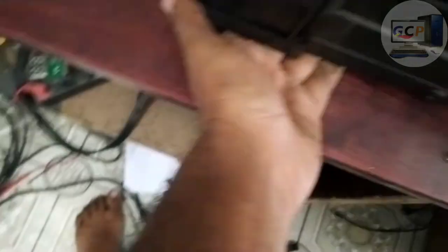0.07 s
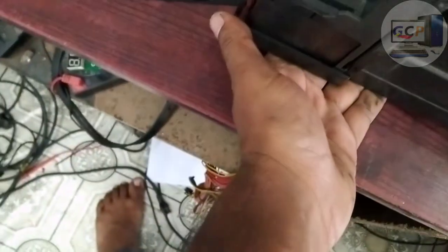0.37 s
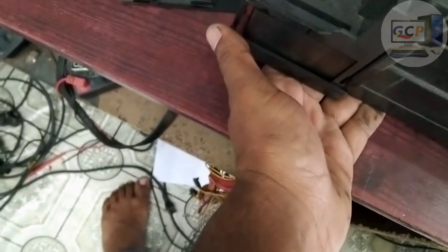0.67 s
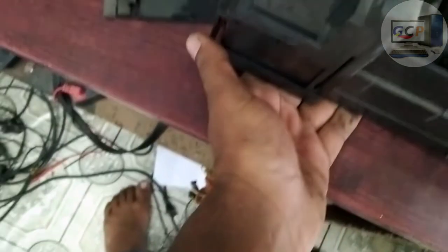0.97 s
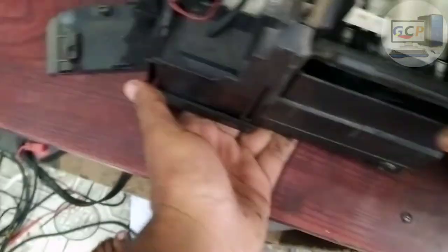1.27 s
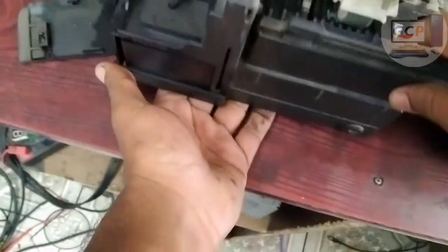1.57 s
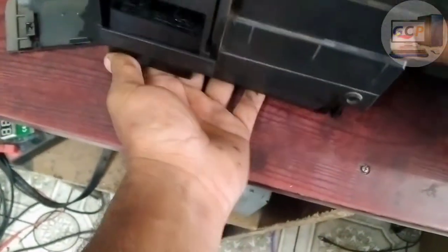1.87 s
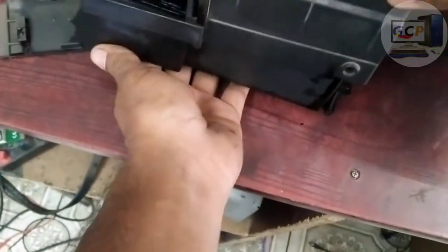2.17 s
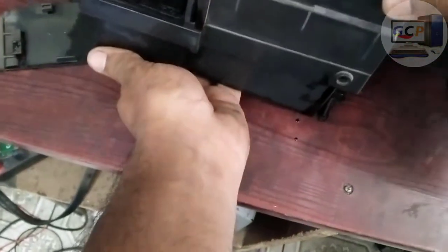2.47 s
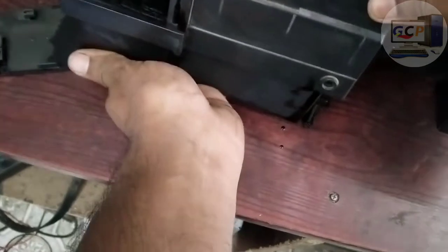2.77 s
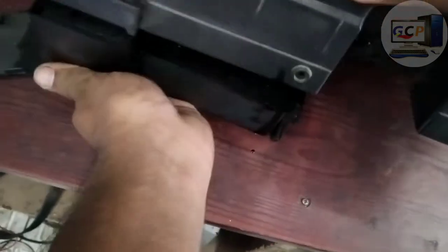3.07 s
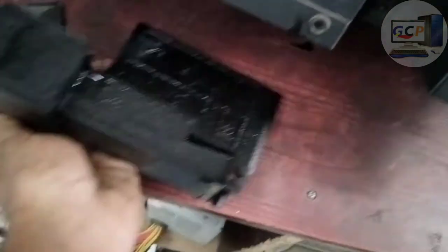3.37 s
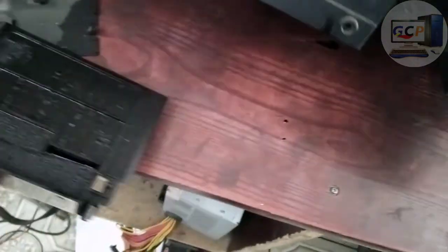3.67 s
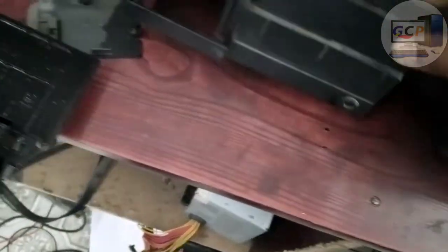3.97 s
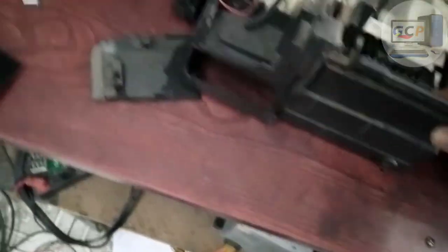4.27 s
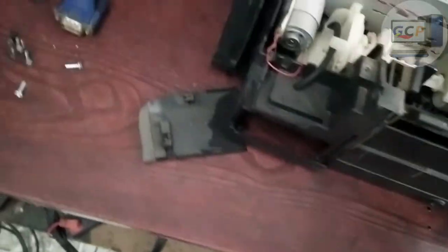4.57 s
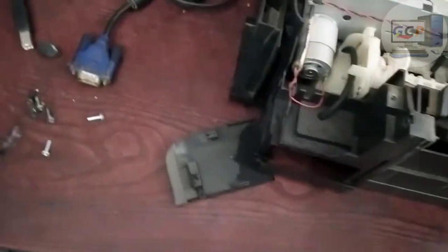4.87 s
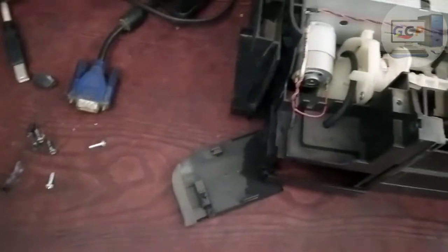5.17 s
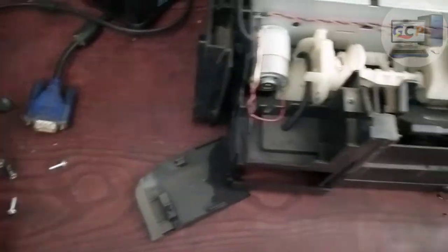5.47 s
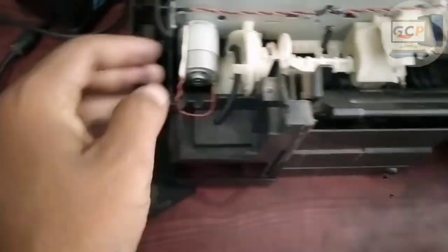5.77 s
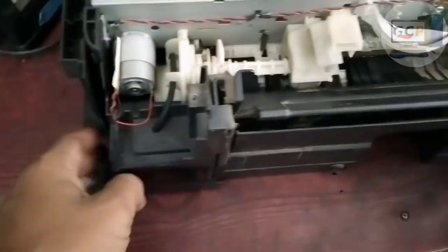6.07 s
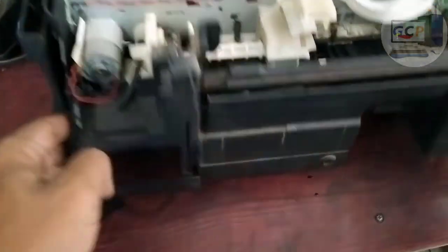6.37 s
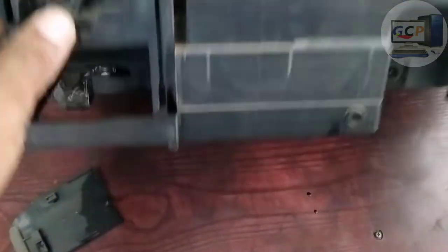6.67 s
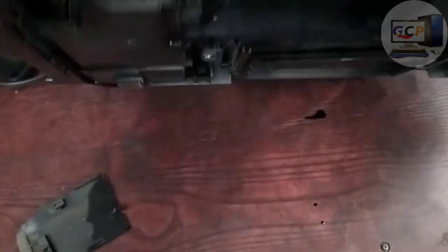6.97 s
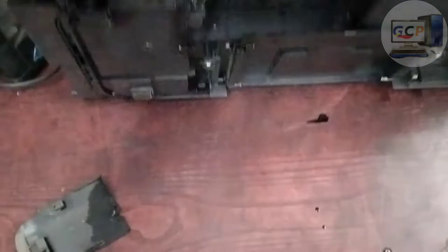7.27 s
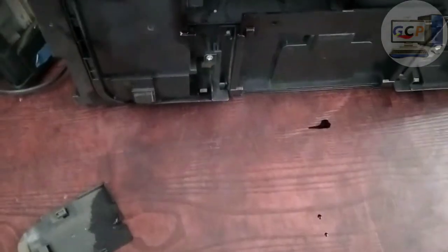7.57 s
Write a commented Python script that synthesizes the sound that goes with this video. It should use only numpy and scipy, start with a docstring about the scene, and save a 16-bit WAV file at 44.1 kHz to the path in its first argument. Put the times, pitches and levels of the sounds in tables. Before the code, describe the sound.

Hands take apart a plastic printer on a wooden table in a small room. Its hollow shell scrapes and briefly squeaks, a catch snaps, and loose tabs tick. Sharp clacks and dull bumps follow as a tray judders out. The printer is set down with a short rattle, then dragged round with a rough groan and tipped over with a loud thump. It all sounds close, with a little room echo.

```python
"""A plastic printer is taken apart by hand on a wooden table in a small room.
Its hollow shell creaks, scrapes and squeaks as it grips and slips under the fingers and on the wood.
Hard parts clack, loose tabs tick, a catch snaps, and a tray judders out and is put aside.
The printer is set down with a rattle, dragged round with a groan and tipped over with a thump."""
import sys
import numpy as np
from scipy import signal
from scipy.fft import rfft, irfft
from scipy.io import wavfile

SR = 44100
rng = np.random.default_rng(int(sys.argv[2]) if len(sys.argv) > 2 else 0)


def file_out(sig):
    """Save sig as 16-bit WAV at sys.argv[1]."""
    # one column per channel
    cols = np.atleast_2d(sig).T
    # limit, then scale
    lim = np.clip(cols, -1, 1)
    pcm = np.round(lim * 32767).astype(np.int16)
    wavfile.write(sys.argv[1], SR, pcm)


N = 336483
TIME = np.arange(N) / SR


def from_db(db):
    """Turn decibels into a number to multiply a sound by."""
    return 10 ** (np.asarray(db) / 20)


def rms_one(x):
    """Scale a sound so its average strength (rms) is 1."""
    return x / np.sqrt(np.mean(x ** 2) + 1e-20)


def unit_energy(x):
    """Scale a sound so its total energy is 1."""
    return x / np.sqrt(np.sum(x ** 2) + 1e-20)


def at_hz(table, hz):
    """Read a value between the rows of a table, on a scale of octaves."""
    row_hz, values = np.transpose(table)
    return np.interp(np.log(hz + 1e-9), np.log(row_hz), values)


def band(x, low_hz, high_hz, order=2):
    """Keep the part of a sound between two frequencies."""
    sections = signal.butter(order, [low_hz, high_hz], "band", fs=SR, output="sos")
    return signal.sosfilt(sections, x + 1e-18)


def add(out, start_s, sound):
    """Mix a short sound in at its start time."""
    i = int(start_s * SR)
    out[i:i + len(sound)] += sound[:N - i]


def drift(turns_per_s):
    """A random wobble, about 1 in size."""
    turns = np.arange(0, N / SR + 1, 1 / turns_per_s)
    return rms_one(np.interp(TIME, turns, rng.standard_normal(len(turns))))


def push(start_s, length_s, level_db, swell_db, fade_db_per_s, rise_s=0.015):
    """The loudness of one hand movement: it sets in, swells or eases, then dies away."""
    t = TIME - start_s
    held_db = level_db + swell_db * np.clip(t / length_s, 0, 1)
    fade_db = fade_db_per_s * np.clip(t - length_s, 0, 1)
    return np.clip(t / rise_s, 0, 1) * from_db(held_db - fade_db)


def resonate(x, tones):
    """Shake an object with x: it rings at its own tones, longer at the narrow ones."""
    out = 0
    for k, (hz, width_hz, db) in enumerate(tones):
        r = np.exp(-np.pi * width_hz / SR)
        feed = np.array([1, 0, -1]) * (1 - r * r) / 2
        feedback = [1, -2 * r * np.cos(2 * np.pi * hz / SR), r * r]
        out = out + (-1) ** k * from_db(db) * signal.lfilter(feed, feedback, x + 1e-18)
    return out


def strike(blows, tones, spread_db):
    """Each blow rings all of an object's tones; each tone fades by 60 dB in its ring_s."""
    out, t = np.zeros(N), TIME[:SR // 2]
    hz, tone_db, ring_s = np.transpose(tones)
    rings = np.sin(2 * np.pi * hz[:, None] * t) * np.exp(-np.log(1000) * t / ring_s[:, None])
    signs = (-1) ** np.arange(len(tones))
    for start_s, db in blows:
        strengths = from_db(db + tone_db + spread_db * rng.standard_normal(len(tones)))
        add(out, start_s, (strengths * signs) @ rings)
    return out


def touches(per_s, low_hz, high_hz, ring_s, spread_db):
    """Light touches at random times each set a different panel ringing briefly."""
    out, t = np.zeros(N), TIME[:SR // 6]
    swell = t / ring_s * np.exp(-t / ring_s)
    for when, pitch, size, phase in rng.random((int(per_s * N / SR), 4)):
        hz = low_hz * (high_hz / low_hz) ** pitch
        ring = swell * np.sin(2 * np.pi * (hz * t + phase))
        add(out, when * N / SR, from_db(spread_db * size) * ring)
    return rms_one(out)


def tiny_slips(per_s, size_db, max_size, judder_db, judder_per_s):
    """Rubbing is many tiny, uneven slips; judder makes them stronger in bunches."""
    sizes = from_db(size_db * np.minimum(rng.exponential(1, N), max_size))
    directions = rng.choice([-1, 1], N)
    slipping = rng.random(N) < per_s / SR
    return slipping * sizes * directions * from_db(judder_db * drift(judder_per_s))


def stick_slip(track, jitter, jitter_per_s, octave_db):
    """A surface grips and slips so fast that the slips become an unsteady tone."""
    times, slips_per_s, db = np.transpose(track)
    pitch_hz = np.interp(TIME, times, slips_per_s) * (1 + jitter * drift(jitter_per_s))
    phase = 2 * np.pi * np.cumsum(pitch_hz) / SR
    loudness = from_db(np.interp(TIME, times, db, left=-200, right=-200))
    return loudness * rms_one(np.sin(phase) + from_db(octave_db) * np.sin(2 * phase))


# The tone of the still air: frequency_hz, level_db
AIR_TONE = [(18, -32.5), (30, -11), (81, -6.5), (222, -19.5), (350, -2.5), (1410, -15.5), (6000, -37.5),
            (15000, -47)]

def air(level_db=-67.5):
    """The room has a faint, steady background noise."""
    hz = np.arange(N // 2 + 1) * SR / N
    spectrum = rfft(rng.standard_normal(N)) * from_db(at_hz(AIR_TONE, hz))
    return from_db(level_db) * rms_one(irfft(spectrum, N))


# The weight shifts in the hands: start_s, length_s, level_db, swell_db
WEIGHT_SHIFTS = [(0, 0.68, -62, 3), (0.635, 0.82, -40, -21.5), (1.917, 0.93, -50.5, 2.5),
                 (3.04, 0.038, -37.5, -14), (4.162, 0.064, -37.5, -15), (4.814, 0.4, -41.5, -23),
                 (5.613, 0.84, -55.5, 10), (6.762, 0.69, -40.5, -5.5)]

def rumble(level_db=-4, housing_db=-10, resting_db=-80):
    """The table grumbles as the weight shifts, and the hollow housing answers."""
    table = touches(per_s=60, low_hz=62, high_hz=354.6, ring_s=0.0063, spread_db=16)
    housing = touches(per_s=23, low_hz=330, high_hz=620, ring_s=0.0052, spread_db=12.5)
    load = np.max([push(*shift, fade_db_per_s=149.5) for shift in WEIGHT_SHIFTS], axis=0)
    return from_db(level_db) * (load + from_db(resting_db)) * (table + from_db(housing_db) * housing)


# The tones of the hollow casing: pitch_hz, width_hz, level_db
CASING_TONES = [(1350, 180, 2.5), (1870, 92, .5), (2640, 300, 0), (3590, 310, 0.5), (4630, 330, 1),
                (5400, 420, 0), (6900, 1100, -1.5)]
# Light grips on the casing: start_s, length_s, level_db, swell_db, treble_db
GRIPS = [(0.366, 0.15, -63, 1.5, 4), (1.055, 0.21, -51.5, -17, -0.5), (1.71, 0.37, -58, -8, 4),
         (2.11, 0.25, -67.5, -4, -8.5), (2.844, 0.099, -40, -10, -8.5), (6.123, 0.33, -50.5, -19.5, 7.5),
         (7.31, 0.36, -56.5, -9, -1)]

def creaks(level_db=-1, bend=0.056, direct_db=-24, split_hz=4000):
    """Little slips under the fingers ring the casing; each grip bends its tones slightly."""
    slips = tiny_slips(per_s=900, size_db=2.5, max_size=3, judder_db=5, judder_per_s=45)
    out = 0
    for *movement, treble_db in GRIPS:
        tones = [(hz * (1 + bend * rng.uniform(-1.1, 1)), width, db) for hz, width, db in CASING_TONES]
        ring = resonate(resonate(slips, tones), tones) + from_db(direct_db) * slips
        mids = band(ring, 900, split_hz, order=3)
        treble = from_db(treble_db) * band(ring, split_hz, 15000, order=3)
        out = out + push(*movement, fade_db_per_s=355.5, rise_s=0.01) * rms_one(mids - treble)
    return from_db(level_db) * out


# The tones of the plastic shell: pitch_hz, width_hz, level_db
SHELL_TONES = [(701, 35, 5), (964, 67, 2), (1197, 110, -4.5), (1921, 20, 3), (4010, 98, -12),
               (6700, 51, -17)]

def shell(force, direct_db):
    """A contact rings the shell; the sound comes back as lows, mids and treble."""
    sound = from_db(direct_db) * force + resonate(force, SHELL_TONES)
    return [band(sound, *edges_hz, order=3) for edges_hz in [(510, 1200), (1300, 3900), (4000, 12000)]]


# Plastic slides over wood or plastic: start_s, length_s, level_db, swell_db, bright_db
SLIDES = [(0.543, 0.25, -33.5, -7.5, -1), (1.332, 0.058, -46.5, 3.5, 0), (1.428, 0.15, -55.5, 0.5, 3.5),
          (3.034, 0.041, -31, 3.5, 0), (3.074, 0.32, -48.5, -2, 3.5), (3.688, 0.13, -52, 14, 1),
          (4.154, 0.057, -42.5, 4, 2.5), (4.274, 0.32, -64, -15.5, 19.5), (6.285, 0.22, -32, -20.5, 1),
          (6.48, 0.46, -47, 14, 1.5), (6.967, 0.19, -45.5, 12.5, 3.5), (7.158, 0.14, -30, -14, -7.5)]

def scrapes(lows_db=-8, mids_db=-3, treble_db=-5):
    """Tiny slips shake the shell and its panels; a bright slide has fewer lows and more treble."""
    slips = tiny_slips(per_s=4600, size_db=2.7, max_size=4, judder_db=4.5, judder_per_s=70)
    lows, mids, treble = map(rms_one, shell(slips, direct_db=-6))
    mid_panels = touches(per_s=300, low_hz=1050, high_hz=4200, ring_s=0.0028, spread_db=9)
    low_panels = touches(per_s=90, low_hz=480, high_hz=1000, ring_s=0.011, spread_db=9)
    low_gain = mid_gain = treble_gain = 0
    for *movement, bright_db in SLIDES:
        force = push(*movement, fade_db_per_s=275.5)
        low_gain = np.maximum(low_gain, force / from_db(bright_db))
        mid_gain = np.maximum(mid_gain, force)
        treble_gain = np.maximum(treble_gain, force * from_db(bright_db))
    return (from_db(lows_db) * low_gain * rms_one(lows + low_panels)
            + from_db(mids_db) * mid_gain * rms_one(mids + mid_panels)
            + from_db(treble_db) * treble_gain * treble)


# The course of the squeak: time_s, slips_per_s, level_db
FOOT_SQUEAK = [(0.546, 940, -28), (.567, 1030, -27), (.587, 1500, -29), (.604, 2400, -23.5),
               (.610, 790, -22.5), (.622, 710, -27.5), (.632, 1000, -68)]

def squeak(level_db=-6.5):
    """One of the printer's feet grips and slips on the wood."""
    return from_db(level_db) * stick_slip(FOOT_SQUEAK, jitter=0.0687, jitter_per_s=600, octave_db=-10.5)


# Hard plastic hits; heavy parts add lows, sharp edges add treble: start_s, level_db, heavy_db, sharp_db
PLASTIC_HITS = [(0.685, -35.5, 2, 4), (0.755, -43.5, 7, -22), (1.068, -48.5, -30, 6.5),
                (1.412, -24.5, -12, -3), (1.781, -33.5, -23, -5), (3.052, -34.5, 6.5, -4),
                (3.074, -32, 6.5, 5.5), (3.211, -39, -6, 1), (3.3511, -32, -29, -5.5),
                (3.757, -41.5, 7, -29), (3.855, -41.5, -9.5, 0.5), (4.169, -34.5, -9, -0.5),
                (4.5397, -46, -41, 8.5), (4.6117, -42.5, -30, -2), (6.297, -40.5, 5.5, 0),
                (6.335, -37, -15, 0), (6.708, -36, -17, -3.5), (6.898, -31, -6, -4), (6.936, -39.5, 8, 0),
                (7.071, -31, -17, -15), (7.120, -24, 0, -3), (7.1525, -30, 3, -4), (7.389, -47, -22, -1)]

def clacks(crack_s=0.0005, chatter_s=0.013, chatter_db=-13, lows_db=24, mids_db=25, treble_db=27):
    """A sharp crack and a moment of chatter run through the shell."""
    out, t = np.zeros(N), TIME[:SR // 8]
    shape = np.exp(-t / crack_s) + from_db(chatter_db) * np.exp(-t / chatter_s)
    for start_s, db, heavy_db, sharp_db in PLASTIC_HITS:
        parts = shell(shape * rng.standard_normal(len(t)), direct_db=-2)
        for part, part_db in zip(parts, (lows_db + heavy_db, mids_db, treble_db + sharp_db)):
            add(out, start_s, from_db(db + part_db) * unit_energy(part))
    return out


# The housing bumps the table: start_s, level_db, pitch_hz
TABLE_BUMPS = [(0.716, -28, 302), (1.793, -41.5, 470), (2.016, -31.5, 290), (2.671, -25, 213),
               (3.079, -22, 584), (3.375, -28.5, 412), (3.687, -30, 473), (3.718, -28.5, 256),
               (4.175, -36.5, 210), (4.186, -41.5, 106), (4.811, -27, 308), (4.819, -36.5, 109),
               (4.927, -42, 247), (5.753, -34, 105), (5.984, -37, 121), (6.944, -24.5, 336),
               (7.122, -15, 453), (7.15, -27, 800), (7.495, -36.5, 248)]

def bumps(rise_s=0.0039, fade_s=0.013, width_ratio=1.577, level_db=-2):
    """Soft knocks push the hollow housing: each is a dull lump of noise around one pitch."""
    out, t = np.zeros(N), TIME[:SR // 4]
    shape = (1 - np.exp(-t / rise_s)) * np.exp(-t / fade_s)
    for start_s, db, hz in TABLE_BUMPS:
        lump = band(shape * rng.standard_normal(len(t)), hz / width_ratio, hz * width_ratio, order=3)
        add(out, start_s, from_db(db + level_db) * lump / np.abs(lump).max())
    return out


# The tones of a plastic tab: pitch_ratio, width_hz, level_db
TAB_TONES = [(0.999, 190, 0.5), (1.97, 296, -3), (2.7, 420, -6), (3.6, 600, -8.5), (5.1, 1300, -7.5)]
# Loose tabs are nudged: start_s, level_db, brush_s, pitch_hz
TAB_NUDGES = [(1.065, -38.5, 0.0015, 1330), (1.565, -38, 0.0043, 736), (1.629, -37, .0035, 1390),
              (1.666, -39, 0.0026, 1320), (1.748, -31, 0.0038, 1316), (1.975, -36.5, 0.0027, 1870),
              (2.084, -42, 0.0023, 1670), (2.147, -42.5, 0.0042, 1380), (2.637, -47.5, 0.0022, 2495),
              (2.705, -34, 0.0028, 1370), (2.856, -28, .007, 1730), (2.997, -39, 0.0032, 3550),
              (4.469, -36.5, 0.0038, 2044), (4.539, -33, .0008, 1800), (4.608, -32, 0.0014, 1430),
              (6.153, -37, 0.0028, 1450), (7.414, -39.5, 0.0037, 1340)]

def tab_ticks(level_db=-1, bend=0.09):
    """A quick brush rings a tab; smaller tabs ring higher, and each has its own upper tones."""
    out, t = np.zeros(N), TIME[:SR // 8]
    for start_s, db, brush_s, hz in TAB_NUDGES:
        tunings = 1 + bend * rng.uniform(-1, 1, len(TAB_TONES))
        tunings[0] = 1   # the lowest tone stays in tune
        tones = [(ratio * hz * tuning, width_hz, tone_db)
                 for (ratio, width_hz, tone_db), tuning in zip(TAB_TONES, tunings)]
        brush = rng.standard_normal(len(t)) * t * np.exp(-t / brush_s)
        tick = resonate(resonate(brush, tones), tones)
        add(out, start_s, from_db(db + level_db) * tick / np.abs(tick).max())
    return out


# Rubbed or dragged panels sing: start_s, length_s, level_db, pitch_hz
SINGING_PANELS = [(1.068, .07, -54, 2680), (1.93, 0.05, -57.5, 6960), (3.985, .13, -60.5, 505),
                  (5.618, 0.04, -59.5, 1393), (5.955, 0.065, -52, 5830), (5.96, .06, -60, 2300),
                  (6.286, 0.11, -46.5, 763), (6.36, .07, -47, 3770), (6.52, 0.18, -53, 983),
                  (6.635, .12, -50, 1213), (6.67, 0.073, -39.5, 1855), (6.796, 0.066, -39, 1158),
                  (6.827, .09, -41.5, 760)]

def whines(width_share=0.065, judder_db=3):
    """Jerky rubbing makes one panel after another sing a thin, rough note."""
    out, rubbing = 0, rng.standard_normal(N)
    for start_s, length_s, db, hz in SINGING_PANELS:
        panel = [(hz, width_share * hz, 0)]
        note = rms_one(resonate(resonate(rubbing, panel), panel))
        out = out + push(start_s, length_s, db, swell_db=0, fade_db_per_s=400, rise_s=0.013) * note
    return out * from_db(judder_db * drift(400))


# The tones of the catch: pitch_hz, level_db, ring_s
CATCH_TONES = [(1185, -10, 0.0094), (1393, -4.5, 0.015), (1520, -11, 0.011), (1885, -13.5, 0.0031),
               (2550, -10.5, 0.0029), (4100, -6.5, .0029), (5900, -4, 0.0011)]

def catch_snap(start_s=1.4109, level_db=-7, count=5, gap_s=0.00088, loss_db=1):
    """The catch snaps free and chatters against its seat, each hit weaker than the last."""
    blows = [(start_s + gap_s * k, level_db - loss_db * k) for k in range(count)]
    return strike(blows, CATCH_TONES, spread_db=0)


# The tray is pulled out: time_s, slips_per_s, level_db
TRAY_PULL = [(3.18, 570, -58.5), (3.40, 634, -45.5), (3.50, 470, -59)]

def tray_judder(judder_db=2):
    """The tray sticks and slips along its rails."""
    tone = stick_slip(TRAY_PULL, jitter=0.21, jitter_per_s=310, octave_db=-35)
    return tone * from_db(judder_db * drift(81))


# Swells of high hiss: start_s, length_s, level_db
HIGH_HISSES = [(3.88, 0.45, -70), (5.421, 1, -70)]

def high_hiss(low_hz=8300, high_hz=9600):
    """A faint, very high hiss swells and fades."""
    loudness = np.zeros(N)
    for start_s, length_s, db in HIGH_HISSES:
        add(loudness, start_s, from_db(db) * np.hanning(int(length_s * SR)))
    return loudness * rms_one(band(rng.standard_normal(N), low_hz, high_hz, order=3))


def set_down(start_s=4.8074, crack_db=-9, rattle_db=-27, rattle_s=0.01):
    """The printer meets the table with one dull crack, and everything inside rattles briefly."""
    out, t = np.zeros(N), TIME[:SR // 3]
    crack = band(signal.unit_impulse(len(t)), low_hz=900, high_hz=4700, order=3)
    noise = band(rng.standard_normal(len(t)), low_hz=1200, high_hz=3600)
    rattle = rms_one(noise) * np.exp(-t / rattle_s)
    add(out, start_s, from_db(crack_db) * crack / np.abs(crack).max() + from_db(rattle_db) * rattle)
    return out


# The tones of the frame: pitch_hz, level_db
FRAME_TONES = [(119, 9), (198, -10), (287, -6.5), (384, 2), (428, -6.5), (500, 0), (620, -7), (703, -1),
               (777, -10)]
# The printer is set down, and later lands on its back: start_s, ring_db, thud_db
LANDINGS = [(4.812, -44.5, -32), (7.124, -32.5, -9.5), (7.152, -39, -11.5)]

def landings(ring_s=0.24):
    """The printer's weight lands with a short thud, and its frame rings briefly."""
    blows = [(start_s, ring_db) for start_s, ring_db, _ in LANDINGS]
    out = strike(blows, [(hz, db, ring_s) for hz, db in FRAME_TONES], spread_db=1.5)
    thud = band(signal.unit_impulse(SR // 10), low_hz=110, high_hz=750, order=3)
    for start_s, _, thud_db in LANDINGS:
        add(out, start_s, from_db(thud_db) * thud / np.abs(thud).max())
    return out


# The printer is dragged round: time_s, slips_per_s, level_db
DRAG = [(6.52, 980, -51), (6.66, 1090, -34), (6.72, 890, -34.5), (6.77, 990, -38), (6.86, 820, -31.5),
        (6.95, 530, -27), (6.98, 210, -45)]

def groan(level_db=-10, judder_db=2.6):
    """The dragged housing grips and slips on the wood, dropping in pitch at the end."""
    tone = stick_slip(DRAG, jitter=0.11, jitter_per_s=480, octave_db=-2.5)
    return from_db(level_db) * tone * from_db(judder_db * drift(150))


# How long the room's echo takes to fade by 60 dB: frequency_hz, fade_s
ECHO_TIMES = [(120, 0.3), (500, 0.18), (2000, 0.34), (5000, 0.25), (10000, 0.22)]

def room(x, build_s=0.015):
    """Echoes off the walls build up quickly, then each frequency band fades at its own speed."""
    t, tail = TIME[:SR * 2 // 3], 0
    edges_hz = np.geomspace(60, 16000, 12)
    for low, high in zip(edges_hz, edges_hz[1:]):
        fade_s = at_hz(ECHO_TIMES, np.sqrt(low * high))
        tail = tail + band(rng.standard_normal(len(t)), low, high) * np.exp(-np.log(1000) * t / fade_s)
    echo = unit_energy(tail * (1 - np.exp(-t / build_s)))
    return signal.fftconvolve(x, echo)[:N]


def scene():
    """Mix all the sounds, giving each group its own share of echo."""
    sliding = creaks() + scrapes() + squeak() + whines() + tray_judder() + high_hiss() + groan()
    knocks = clacks() + tab_ticks() + set_down()
    snap = catch_snap()
    weight = rumble() + bumps() + landings()
    to_walls = (from_db(-11.5) * sliding + from_db(-9) * knocks
                + from_db(-13.5) * snap + from_db(-7.5) * weight)
    return (sliding + knocks + snap + weight + room(to_walls) + air())[None]


def record(dry, dull_hz=7900, leak_db=-30, thin_hz=52, hiss_db=-94, cutoff_hz=15700):
    """The microphone dulls the treble, thins the deep bass and hisses faintly; the very top is cut."""
    dull = signal.sosfilt(signal.butter(10, dull_hz, fs=SR, output="sos"), dry)
    bass_cut = signal.butter(3, thin_hz, "high", fs=SR, output="sos")
    heard = signal.sosfilt(bass_cut, dull + from_db(leak_db) * dry)
    hiss = from_db(hiss_db) * rng.standard_normal(N)
    top_cut = signal.ellip(10, 0.1, 80, cutoff_hz, fs=SR, output="sos")
    return signal.sosfilt(top_cut, heard + hiss)


dry = scene()
out = record(dry)
file_out(out)
```